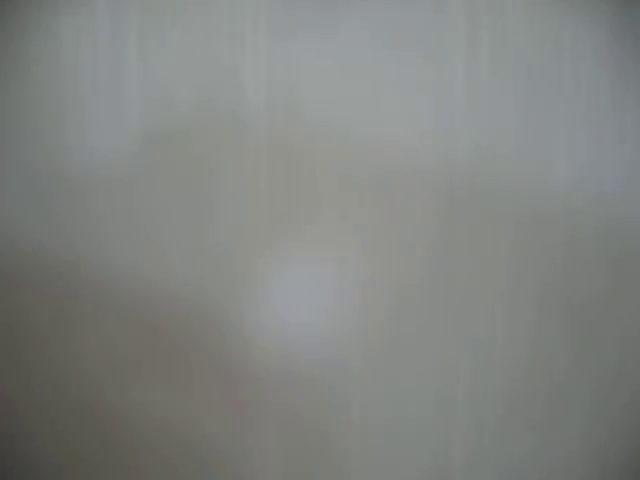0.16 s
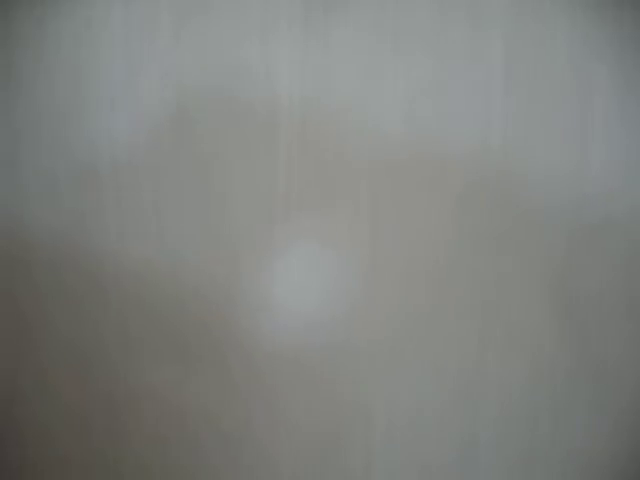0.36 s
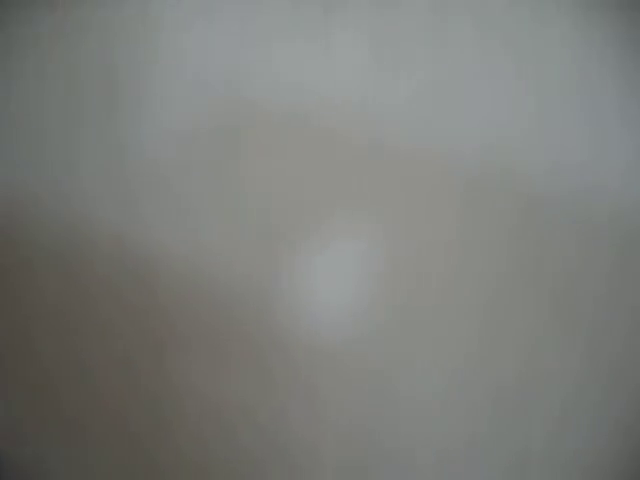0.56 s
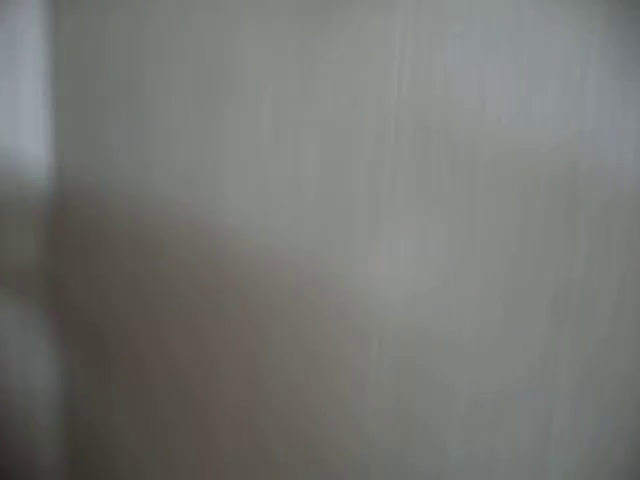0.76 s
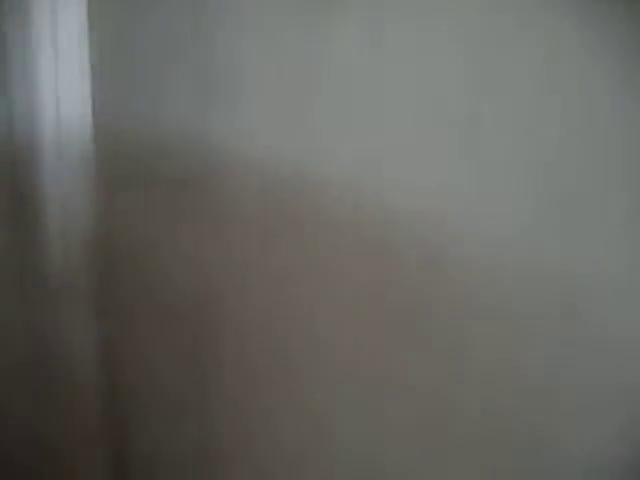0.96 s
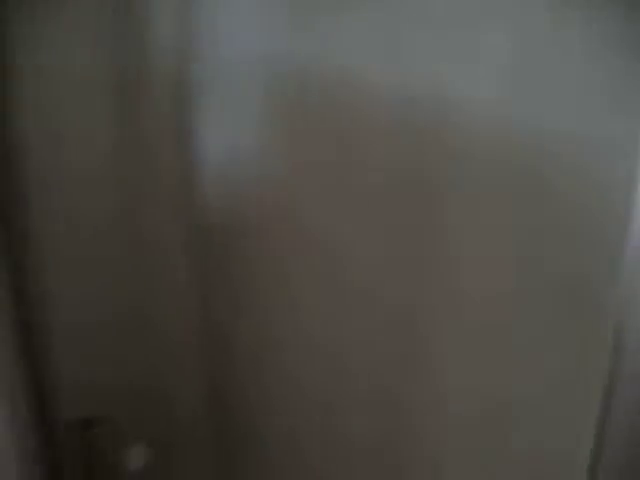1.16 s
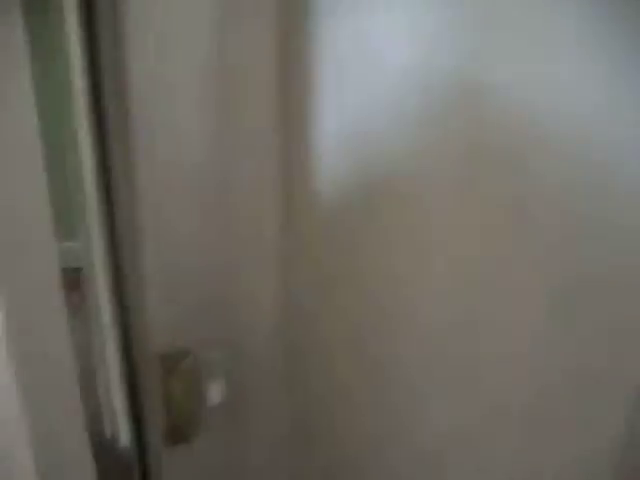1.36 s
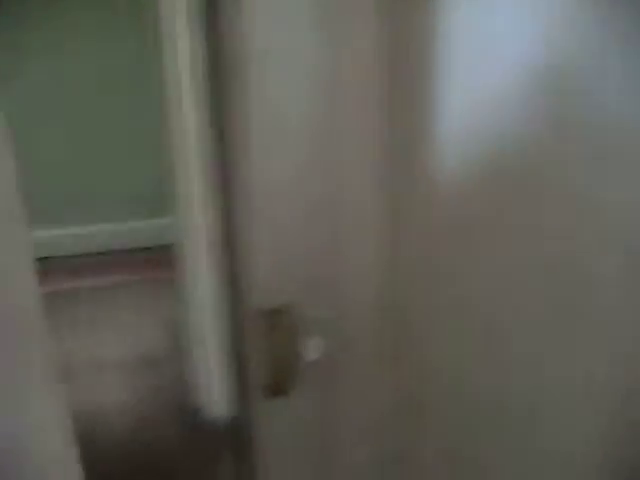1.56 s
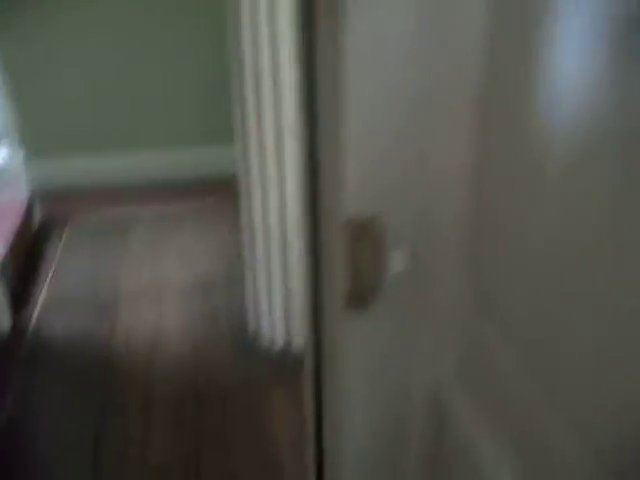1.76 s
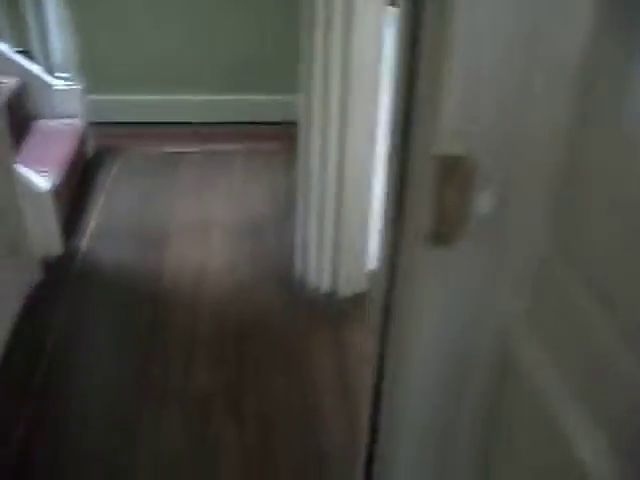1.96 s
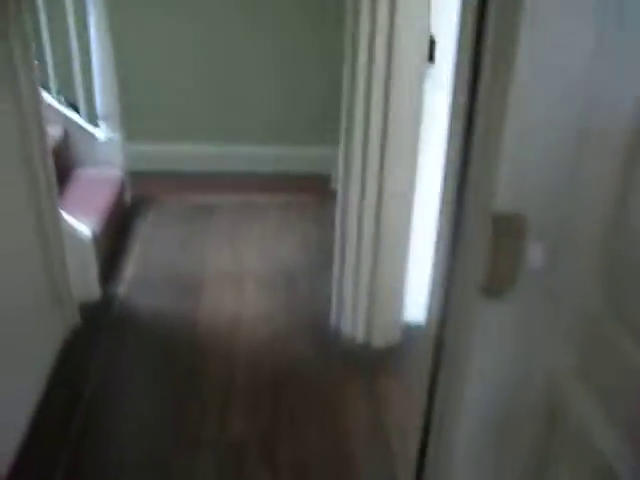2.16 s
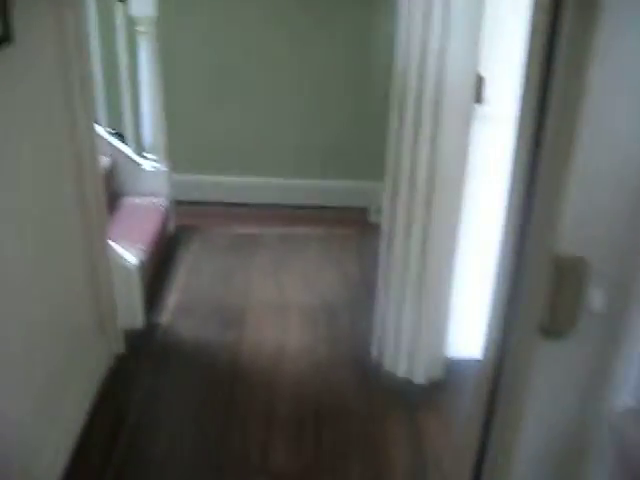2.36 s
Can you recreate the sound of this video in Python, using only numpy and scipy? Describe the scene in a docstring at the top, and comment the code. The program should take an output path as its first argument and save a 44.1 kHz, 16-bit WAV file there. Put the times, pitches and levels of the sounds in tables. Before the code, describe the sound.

A loud double clack of wood at 0.2 seconds, the second hit strongest at 0.25, rings with a short hallway echo and low bumps. A dull handling thud and soft knock follow at 0.4, a faint tick at 0.55. After a lull, light step clicks and scuffs come at 1.4, a tiny high squeak at 1.7, faint knocks, and a hollow board knock at 1.95, over low motor hum, rumble and hiss.

```python
"""A loud double clack of wood rings in the hallway of an old house, among softer knocks on wood.
Clacks and knocks are noise bursts that set off decaying modes and a noise-built hall echo.
Slow steps past a wooden door scuff (grainy noise), thud (decaying sines) and squeak (a gliding tone).
The hand bumps the camera, over a low motor hum (wavering harmonics), rumble and hiss (shaped noise)."""
import sys
import numpy as np
from scipy import signal
from scipy.fft import rfft, irfft
from scipy.io import wavfile
from scipy.ndimage import uniform_filter1d

SR = 44100
rng = np.random.default_rng(int(sys.argv[2]) if len(sys.argv) > 2 else 0)


def materialize(psi):
    """Save the field psi as 16-bit PCM at rate SR to the path in sys.argv[1].

    A 1-D psi becomes a single channel; in a 2-D psi each row is a channel.
    """
    bounded = np.clip(np.atleast_2d(psi).T, -1, 1)
    quanta = np.round(bounded * 32767).astype(np.int16)
    wavfile.write(sys.argv[1], SR, quanta)


N = 105840

# Knocks on wood. Each row: start in seconds, level in dB, tilt in dB per octave, contact decay in seconds,
# room level in dB, low cut in Hz, pitch of the struck spot in Hz, spot level in dB re the knock.
KNOCKS = [(0.001, -40, -8, 0.01, -3.5, 100, 273, -5), (0.014, -43, -5.5, 0.0042, -6, 100, 870, -16),
          (0.141, -49.5, -12, 0.0031, -10, 150, 846, 5.5), (0.2125, -25, 2.5, 0.0046, -6, 500, 1643, -3),
          (0.2209, -23.5, -4.5, 0.0042, -7.5, 950, 1384, -13),
          (0.2501, -15.5, -0.5, 0.0045, -3.5, 256, 867, -6.5),
          (0.4196, -39, -2, 0.0077, -2.5, 650, 5440, -9), (0.5513, -41, 3, 0.0016, -6.5, 800, 1344, -4.5),
          (1.4063, -38, 0.5, .006, 0.5, 900, 1750, -4), (1.4226, -32.5, 1, 0.0043, -1, 650, 5800, -6),
          (1.4320, -42, -0.5, 0.0089, -2, 500, 1090, 10.5), (1.744, -43.5, -2, 0.0056, -4, 200, 824, -3),
          (1.7625, -42.5, -2, 0.0052, -4, 400, 4250, -5), (1.7717, -42.5, -3, 0.0068, 0, 450, 1560, 0)]
CONTACT_RISE_S, CONTACT_HOLD_DECAYS, SPOT_T60_S = 0.0002, 1, 0.075
# Spectrum of a contact on wood. Each row: frequency in Hz, relative level in dB.
WOOD_SPECTRUM = [(60, -15), (170, -13), (350, -11), (570, -2.5), (720, -9.5), (900, -2.5), (1100, -8),
                 (1400, -6), (2200, -4.5), (2750, -10.5), (3700, -11), (5700, -17), (9500, -17.5),
                 (12000, -20)]
# Broad resonances of the wood. Each row: frequency in Hz, width in Hz, boost in dB.
WOOD_PEAKS = [(820, 93, 4.2), (1317, 190, 7.4), (1660, 80, 6.6), (1995, 41, 6.2), (2300, 110, 3.7),
              (3100, 120, 7), (3690, 173, 9.7), (4920, 290, 6.4), (6860, 200, 4), (8200, 120, 5.9),
              (9600, 210, 2.5)]
# Ringing modes of the wood. Each row: frequency in Hz, relative level in dB, T60 in seconds.
WOOD_MODES = [(408, 5.5, 0.4), (515, 1, 0.37), (595, -13, 0.14), (828, -4, 0.38), (885, -6.5, 0.28),
              (969, 0.5, 0.5), (1280, 3, 0.18), (1417, -9, .26), (1473, 1, 0.16), (1640, -5, .35),
              (1846, -15, .45), (2055, -9, 0.23), (2084, 3, 0.3), (2092, 2, 0.11), (2750, 8, 0.11),
              (3062, -6, 0.15), (3480, -1.5, 0.39), (3650, -11, 0.48), (7050, -11, 0.31), (7235, -12, .35)]
# Hallway echo bands. Each row: frequency in Hz, relative level in dB, T60 in seconds.
HALL_BANDS = [(100, -21, 0.64), (250, -4.5, 0.47), (450, -3.5, 0.34), (650, -5.5, 0.37), (950, -1, 0.36),
              (1600, -6, 0.4), (2100, -4.5, 0.46), (2850, -11, 0.35), (3420, -6, 0.4), (4170, -15, 0.38),
              (9300, -18, 0.27), (12000, -25, .25)]
HALL_DELAY_S, HALL_BUILD_S = 0.0067, 0.0083
WALL_S, WALL_WIDTH_S, WALL_DB = 0.049, 0.01, 2.2  # early slap from the far wall
MODES_DB, HALL_DB = -19, -1.5  # shares of ringing wood and hall echo in a knock's tail

# Soles sliding. Each row: peak time in seconds, rise in seconds, fall in seconds, level in dB,
# tilt in dB per octave, low cut in Hz.
SCUFFS = [(0.21, 0.0034, 0.0022, -36, -2, 1000), (1.403, 0.032, .025, -45, -1.5, 900),
          (1.468, 0.012, 0.011, -47, -4, 600), (1.62, 0.039, .06, -58.5, -0.5, 700),
          (1.778, 0.017, 0.042, -52, -2.5, 400), (2.26, 0.07, 0.15, -55, -10.5, 200)]
# Dull bumps of heel and hand. Each row: start in seconds, frequency in Hz, level in dB, decay in seconds.
THUDS = [(0.002, 43.4, -48, 0.029), (0.003, 100, -43, 0.028), (0.2, 42.3, -28, 0.06),
         (0.200, 135.5, -34.5, 0.035), (0.253, 78, -33, 0.046), (0.390, 67, -28.5, 0.021),
         (0.393, 139.3, -37.5, 0.032), (0.209, 288, -40.5, 0.022), (1.834, 47, -38, 0.038)]
THUD_RISE_S = 0.003
# Hollow knock of a board. Each row: start in seconds, level in dB.
BOARD_HITS = [(1.9527, -35), (1.9667, -39)]
# Modes of that board. Each row: frequency in Hz, relative level in dB, T60 in seconds.
BOARD_MODES = [(167, -14, 0.34), (237, -14, .15), (277, -5.5, 0.22), (301.5, -12.5, 0.31), (345, -1, 0.084),
               (364, -23, 0.13)]
BOARD_SOFT_HZ = 480  # a soft heel rounds the attack
# Shoe squeak. Each row: time in seconds, pitch in Hz, level in dB.
SQUEAK = [(1.692, 7150, -64), (1.698, 7080, -47), (1.704, 6950, -47), (1.709, 6970, -36),
          (1.714, 6930, -49), (1.722, 6840, -68)]
SQUEAK_ROUGHNESS, SQUEAK_ROOM_DB = 0.011, -8  # roughness: relative pitch spread

# Motor hum. Each row: multiple of the fundamental, level in dB, waver in dB.
HUM = [(1, -44.5, 1.2), (2, -57.5, 1.6), (3, -54, 2.3), (6, -66, 2)]
HUM_HZ = 29.78
# Handling rumble spectrum. Each row: frequency in Hz, relative level in dB.
RUMBLE_SPECTRUM = [(12, -16), (25, 2.5), (50, -3.5), (100, -3.5), (150, -10.5), (200, -12), (280, -13),
                   (400, -19), (800, -25), (2000, -39), (6000, -77)]
RUMBLE_DB, RUMBLE_WAVER_DB = -47, 0.8  # before LOW_GAIN
# Gain on hum and rumble, with brief dips. Each row: time in seconds, gain in dB.
LOW_GAIN = [(0, 6.5), (.28, 1), (.35, -0.5), (.45, 1.5), (.65, 0), (.95, -0.5), (1.15, 1), (1.35, -1.5),
            (1.5, 1), (1.88, 0), (2.02, -2.5), (2.17, -1), (2.4, 0)]
# Hiss spectrum. Each row: frequency in Hz, relative level in dB.
HISS_SPECTRUM = [(100, -1.5), (600, 4), (1200, 1), (2200, -1.5), (4000, -4), (6300, -5.5), (7200, -5),
                 (8200, -6.5), (10200, -8), (12000, -14.5)]
HISS_DB = -52.5  # before the microphone
# Microphone treble response. Each row: frequency in Hz, gain in dB.
MIC_RESPONSE = [(10300, -0.5), (11000, -13.5), (11700, -12), (12300, -24)]
TOP_HZ = 12300


def undb(db):
    """Decibels to gain."""
    return 10 ** (np.asarray(db) / 20)


def unit(x):
    """Scale to rms 1."""
    return x / np.sqrt(np.mean(x ** 2) + 1e-30)


def since(start_s):
    """Seconds since a moment, zero before it."""
    return np.maximum(np.arange(N) / SR - start_s, 0)


def place(x, start_s):
    """Start a sound at a moment."""
    lead = np.zeros(max(int(start_s * SR), 0))
    return np.concatenate([lead, x, np.zeros(N)])[:N]


def low_cut(x, cut_hz):
    """High-pass: light contacts move little bass."""
    return signal.sosfilt(signal.butter(2, cut_hz, "high", fs=SR, output="sos"), x + 1e-12)


def curve(points, hz):
    """Interpolate a table on a log-frequency axis."""
    p = np.array(points, float)
    return np.interp(np.log(np.maximum(hz, 1)), np.log(p[:, 0]), p[:, 1])


def colour(x, points, tilt_db=0, peaks=(), size=8192):
    """Minimum-phase filter from a spectrum, a tilt about 2 kHz (flat below 500 Hz) and resonances."""
    hz = np.maximum(np.arange(size // 2 + 1) * SR / size, 1)
    db = curve(points, hz) + tilt_db * np.log2(np.maximum(hz, 500) / 2000)
    for peak_hz, width_hz, peak_db in peaks:
        db = db + peak_db / (1 + (2 * (hz - peak_hz) / width_hz) ** 2)
    # fold the cepstrum to make the filter causal
    cepstrum = irfft(np.log(undb(db)))
    cepstrum[1:size // 2] *= 2
    cepstrum[size // 2 + 1:] = 0
    impulse = irfft(np.exp(rfft(cepstrum)))
    return signal.fftconvolve(x, impulse)[:N]


def walk(rate_hz):
    """Random wander, spread 1: held random steps, smoothed twice."""
    k = max(int(SR / rate_hz), 1)
    steps = np.repeat(rng.standard_normal(N)[:N // k + 2], k)
    return unit(uniform_filter1d(uniform_filter1d(steps, k), k)[:N])


def even_noise(count):
    """A short stretch of noise with equal strength at all frequencies."""
    return unit(irfft(np.exp(2j * np.pi * rng.random(count // 2 + 1))))


def knocks():
    """Each knock is a brief chatter of contact that rings the struck spot, the wood and the hall."""
    out, hall = 0, hallway()
    span = np.sqrt(0.01 * SR / N)  # refers the burst's rms to 10 ms
    for start_s, db, tilt_db, decay_s, room_db, cut_hz, spot_hz, spot_db in KNOCKS:
        chatter = np.concatenate([even_noise(count=512) for _ in range(16)])
        rise = 1 - np.exp(-since(start_s) / CONTACT_RISE_S)
        fall = np.exp(-since(start_s + CONTACT_HOLD_DECAYS * decay_s) / decay_s)
        contact = place(chatter, start_s) * rise * fall
        crack = unit(low_cut(colour(contact, WOOD_SPECTRUM, tilt_db, WOOD_PEAKS), cut_hz))
        hall_tail = undb(HALL_DB) * span * unit(colour(place(hall, start_s), HALL_BANDS, tilt_db))
        wood_tail = undb(MODES_DB) * ring(WOOD_MODES, start_s, tilt_db / 2)
        tail = low_cut(hall_tail + wood_tail, cut_hz)
        spot = ring([(spot_hz, spot_db, SPOT_T60_S)], start_s)
        out = out + undb(db) * (span * crack + spot + undb(room_db) * tail)
    return out


def ring(modes, start_s, tilt_db=0):
    """Struck modes: sines decaying exponentially, kept for one second."""
    t, out = since(0)[:SR], 0
    for hz, db, t60_s in modes:
        gain = undb(db + tilt_db * np.log2(hz / 2000))
        out = out + gain * np.sin(2 * np.pi * hz * t) * np.exp(-np.log(1000) * t / t60_s)
    return place(out, start_s)


def hallway():
    """Hall echo: noise builds up, each band dies at its own rate, with an early wall slap."""
    t, hz = since(0), np.arange(N // 2 + 1) * SR / N
    noise, out = rfft(rng.standard_normal(N)), 0
    for k, (_, _, t60_s) in enumerate(HALL_BANDS):
        share = curve([(row[0], j == k) for j, row in enumerate(HALL_BANDS)], hz)
        out = out + irfft(noise * share, N) * np.exp(-np.log(1000) * t / t60_s)
    slap = undb(WALL_DB * np.exp(-((t - WALL_S) / WALL_WIDTH_S) ** 2))
    return out * slap * (1 - np.exp(-since(HALL_DELAY_S) / HALL_BUILD_S))


def scuffs():
    """Soles brush the boards: grainy friction noise that swells and fades."""
    t, out = since(0), 0
    for peak_s, rise_s, fall_s, db, tilt_db, cut_hz in SCUFFS:
        grain = rng.standard_normal(N) * undb(2.5 * walk(300))
        env = np.exp(-np.where(t < peak_s, (peak_s - t) / rise_s, (t - peak_s) / fall_s) ** 2)
        friction = unit(low_cut(colour(grain, WOOD_SPECTRUM, tilt_db, WOOD_PEAKS), cut_hz))
        out = out + undb(db) * env * friction
    return out


def thuds():
    """Bumps of heel and hand: low sines with a soft onset and exponential decay."""
    out = 0
    for start_s, hz, db, decay_s in THUDS:
        t = since(start_s)
        env = (1 - np.exp(-t / THUD_RISE_S)) * np.exp(-t / decay_s)
        out = out + undb(db) * np.sin(2 * np.pi * hz * t) * env
    return out


def board():
    """Hollow knock: a heel sets off the modes of a board, low-passed to soften the attack."""
    hits = sum(undb(db) * ring(BOARD_MODES, start_s) for start_s, db in BOARD_HITS)
    return signal.sosfilt(signal.butter(4, BOARD_SOFT_HZ, fs=SR, output="sos"), hits)


def squeak():
    """Shoe squeak: a thin, rough, slightly falling tone and its hall echo."""
    t, (time_s, hz, db) = since(0), np.array(SQUEAK).T
    pitch_hz = np.interp(t, time_s, hz) * (1 + SQUEAK_ROUGHNESS * walk(900))
    gate = (t > time_s[0]) * (t < time_s[-1])
    level = np.sqrt(2) * undb(np.interp(t, time_s, db)) * gate
    tone = np.sin(2 * np.pi * np.cumsum(pitch_hz) / SR) * level
    echo = unit(signal.fftconvolve(tone, hallway())[:N])
    return tone + undb(SQUEAK_ROOM_DB) * np.std(tone) * echo


def motor_hum():
    """Harmonics of one wandering rotation, each wavering in level."""
    turn = 2 * np.pi * np.cumsum(HUM_HZ * (1 + 0.01474 * walk(10.08))) / SR
    out = 0
    for multiple, db, waver_db in HUM:
        level = np.sqrt(2) * undb(db + waver_db * walk(7))
        out = out + level * np.sin(multiple * turn + 2 * np.pi * rng.random())
    return out


def rumble():
    """Handling rumble: bass-heavy noise, wavering in level."""
    noise = unit(colour(rng.standard_normal(N), RUMBLE_SPECTRUM))
    return noise * undb(RUMBLE_DB + RUMBLE_WAVER_DB * walk(7.7))


def hiss():
    """Steady shaped noise."""
    return undb(HISS_DB) * unit(colour(rng.standard_normal(N), HISS_SPECTRUM))


def background():
    """Hum and rumble under a shared gain curve, plus hiss."""
    low_gain = undb(np.interp(since(0), *np.array(LOW_GAIN).T))
    return (motor_hum() + rumble()) * low_gain + hiss()


def scene():
    """All sources at the one microphone."""
    return (knocks() + scuffs() + thuds() + board() + squeak() + background())[None]


def record(dry):
    """The microphone dulls the top and cuts it off steeply."""
    top_cut = signal.ellip(10, 0.2, 80, TOP_HZ, fs=SR, output="sos")
    return signal.sosfilt(top_cut, colour(dry[0], MIC_RESPONSE))[None]


dry = scene()
out = record(dry)
materialize(out)
```